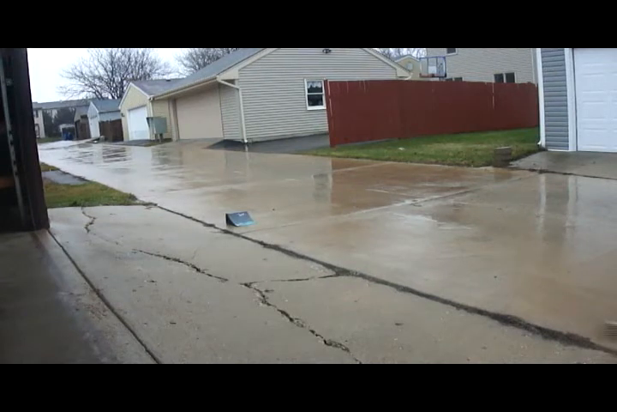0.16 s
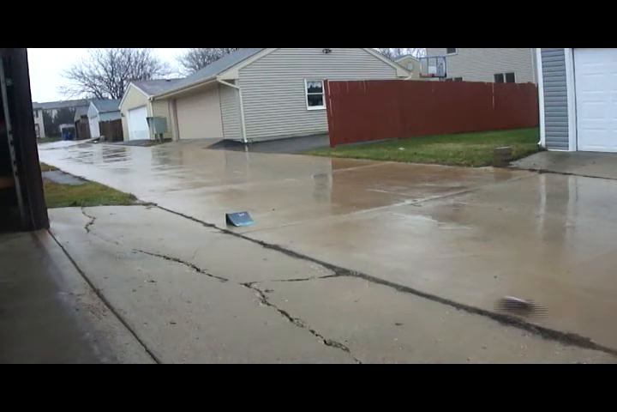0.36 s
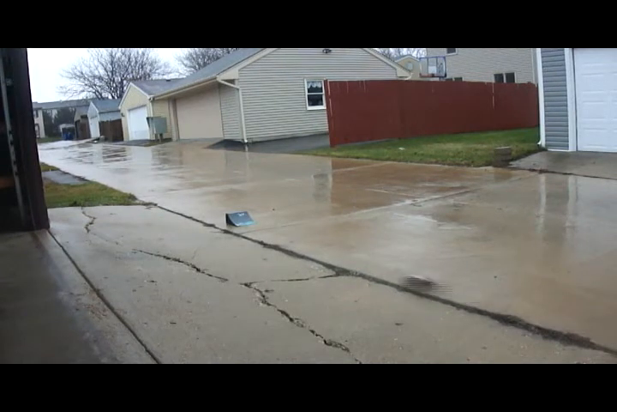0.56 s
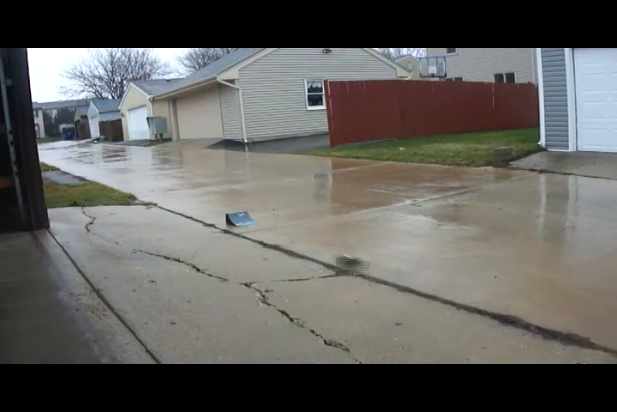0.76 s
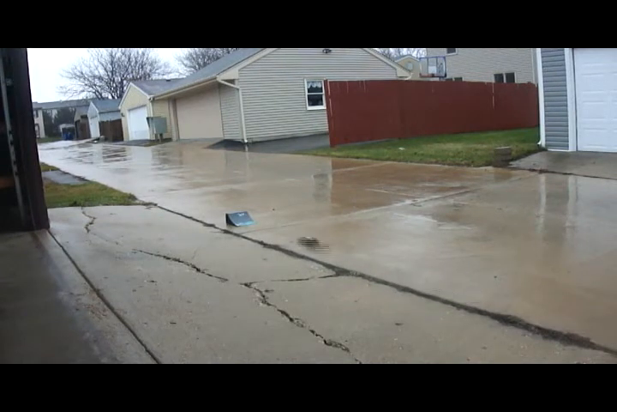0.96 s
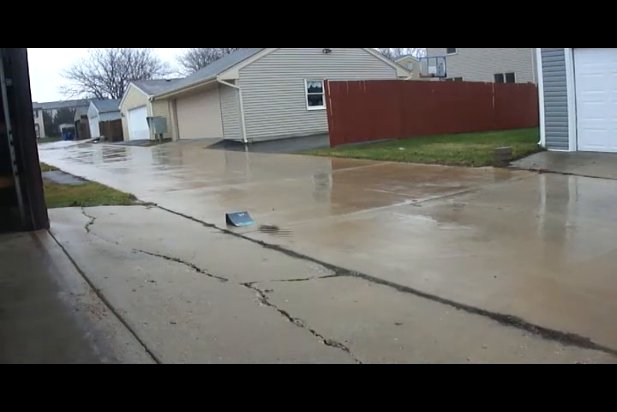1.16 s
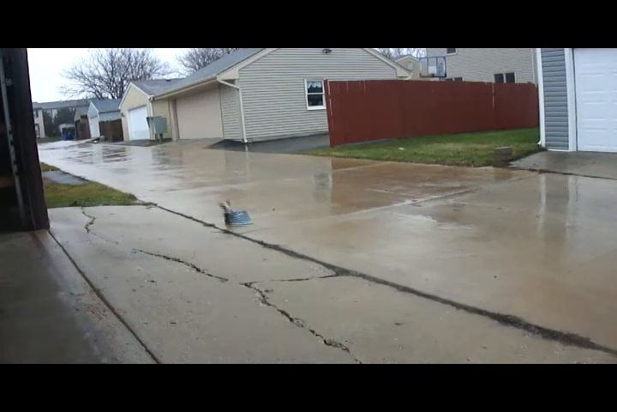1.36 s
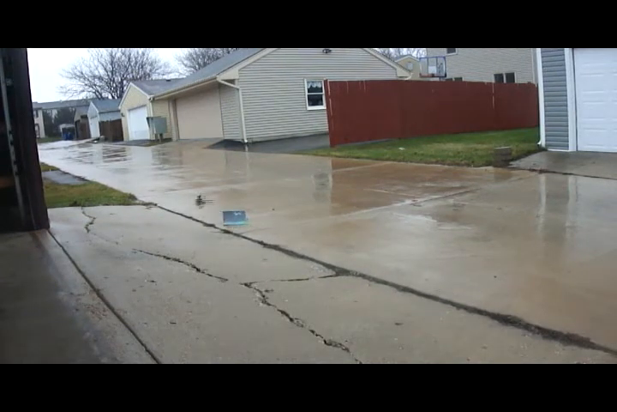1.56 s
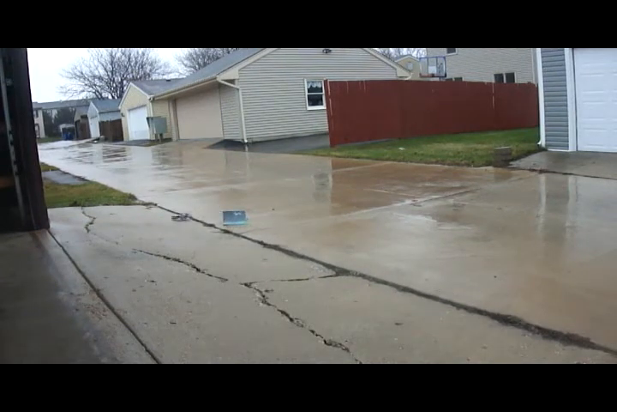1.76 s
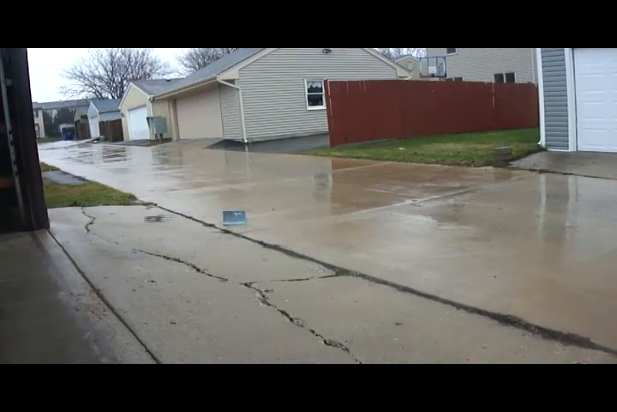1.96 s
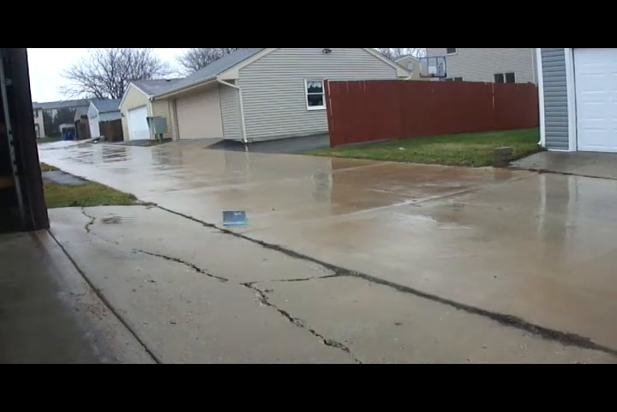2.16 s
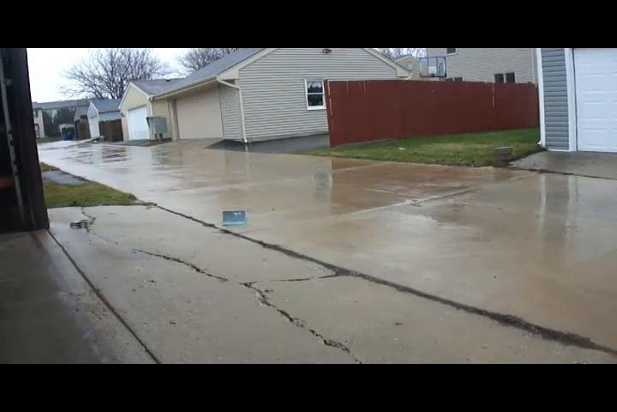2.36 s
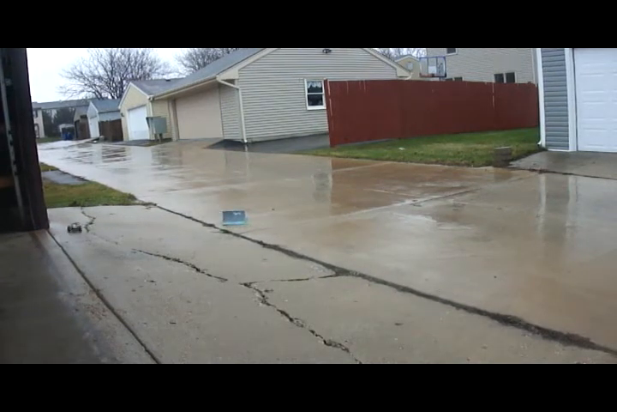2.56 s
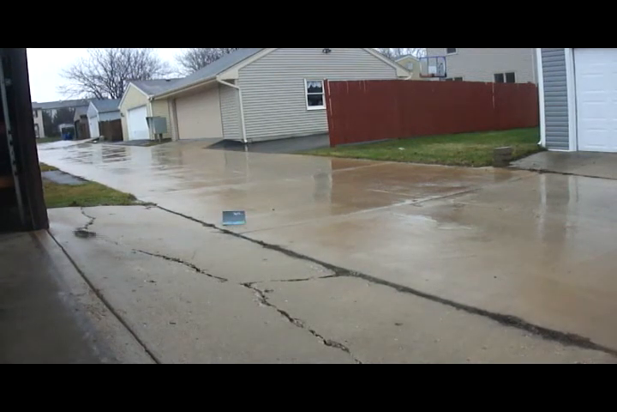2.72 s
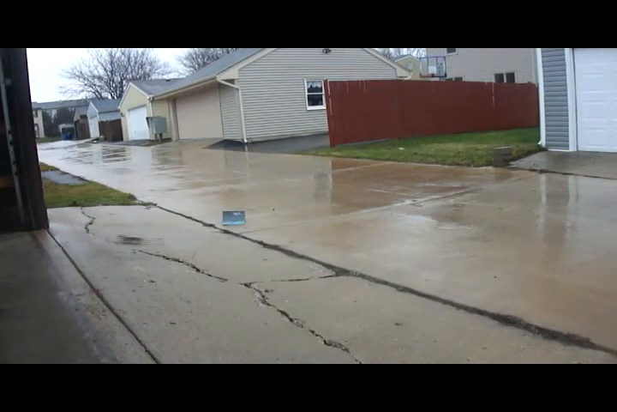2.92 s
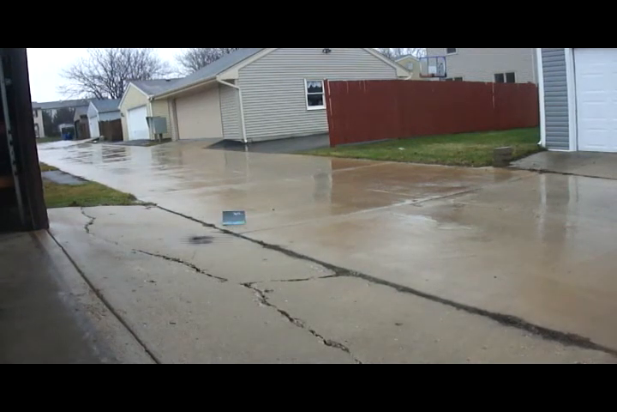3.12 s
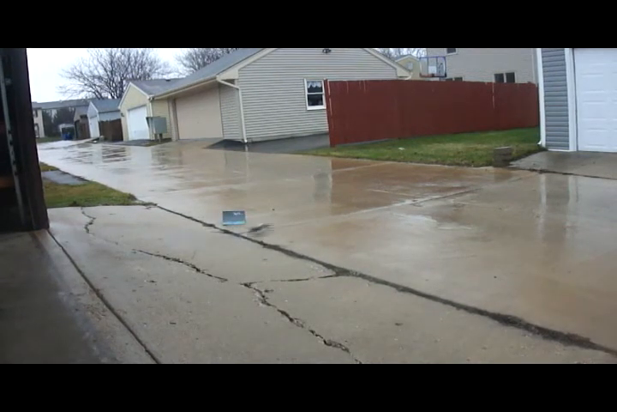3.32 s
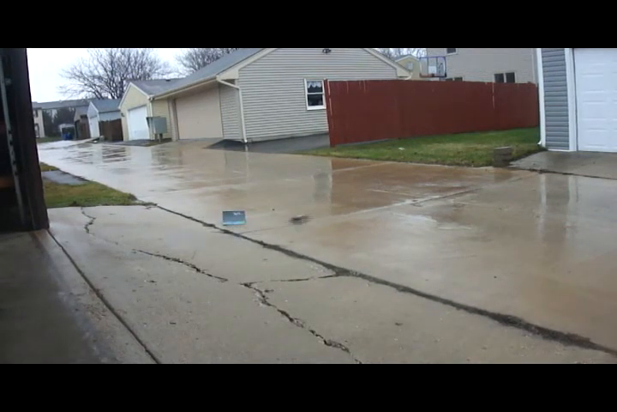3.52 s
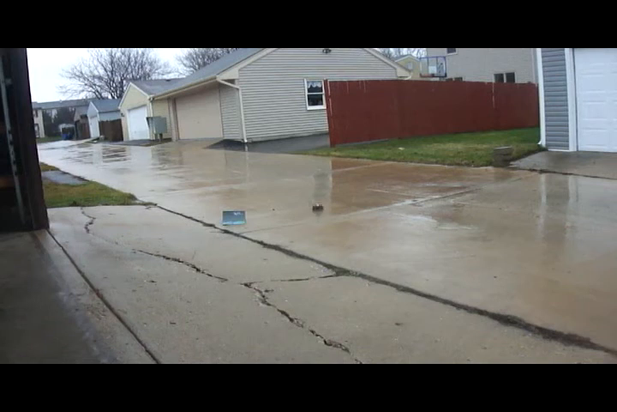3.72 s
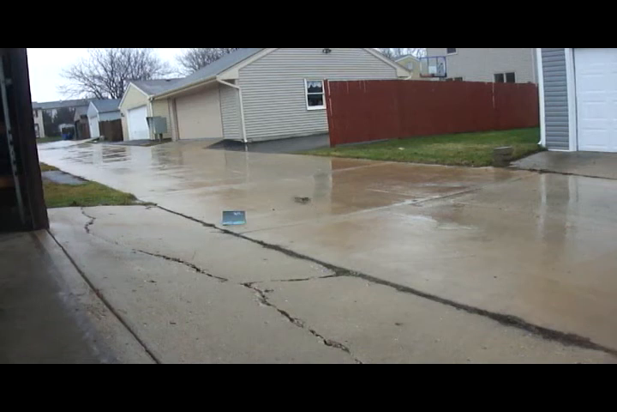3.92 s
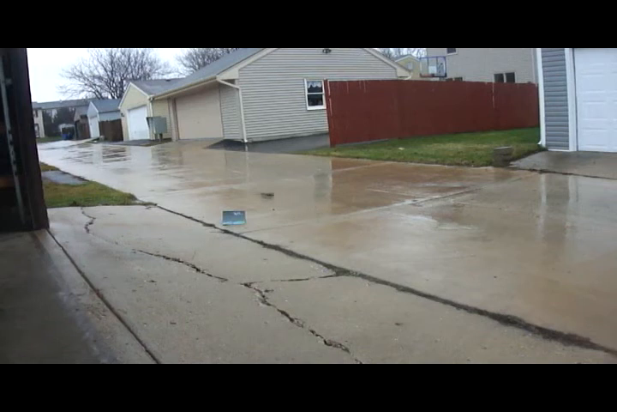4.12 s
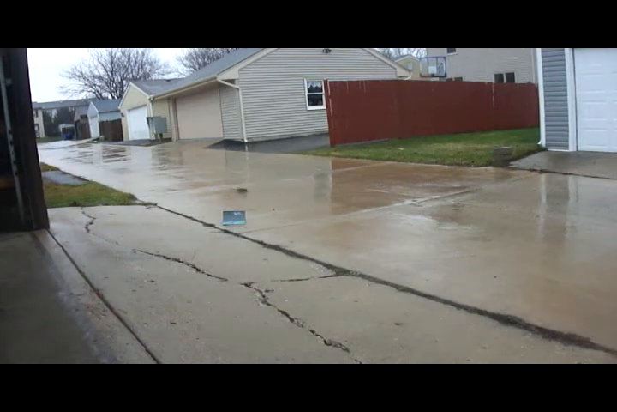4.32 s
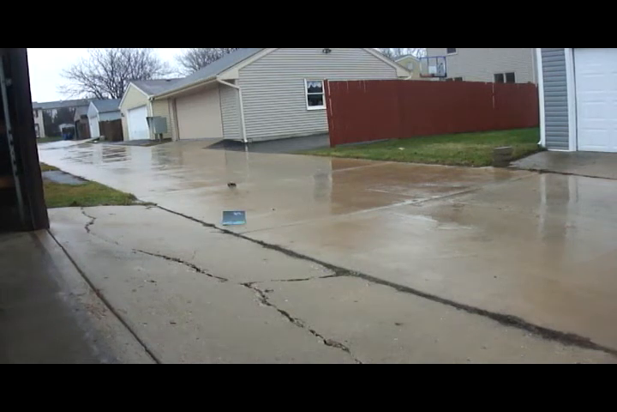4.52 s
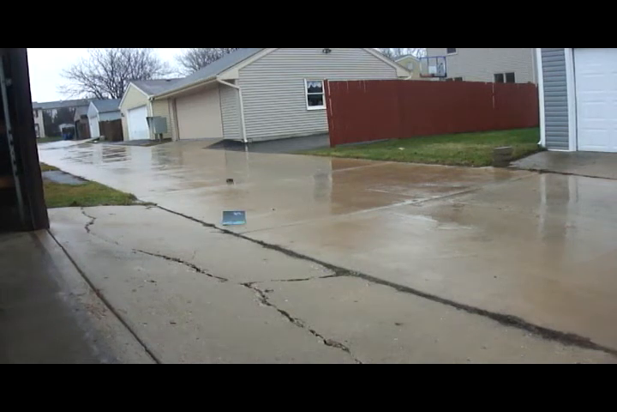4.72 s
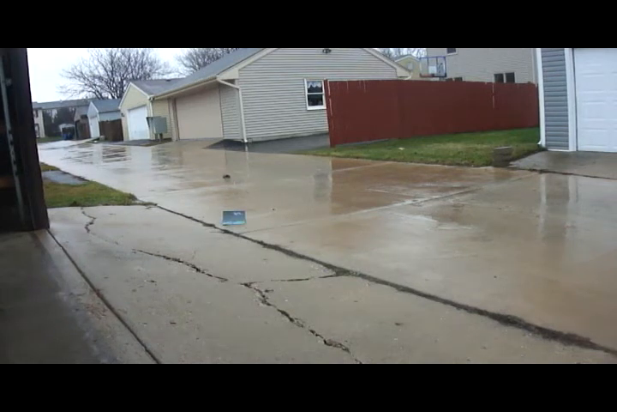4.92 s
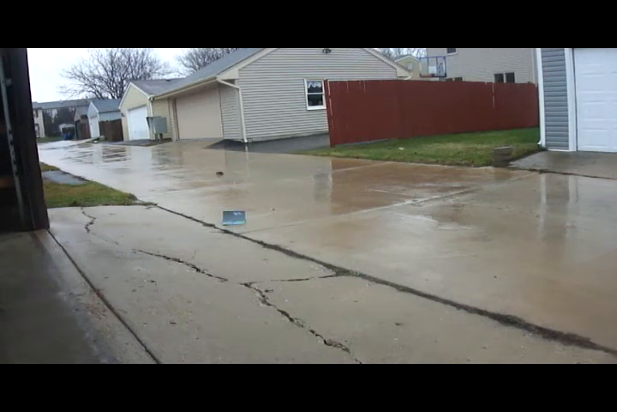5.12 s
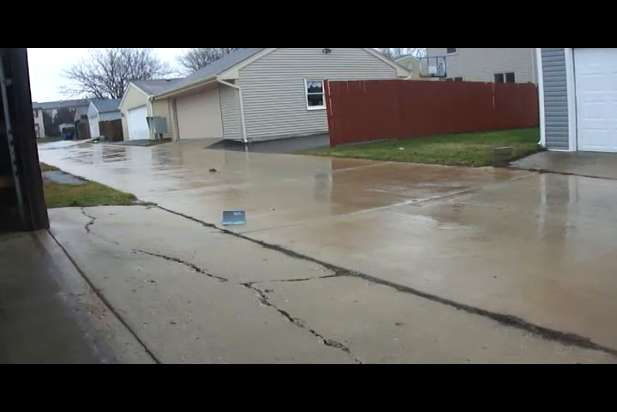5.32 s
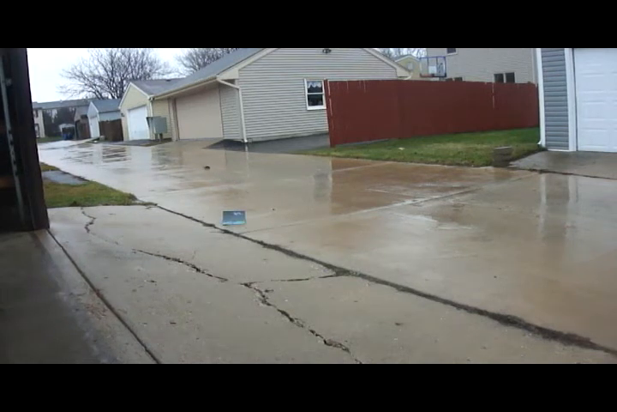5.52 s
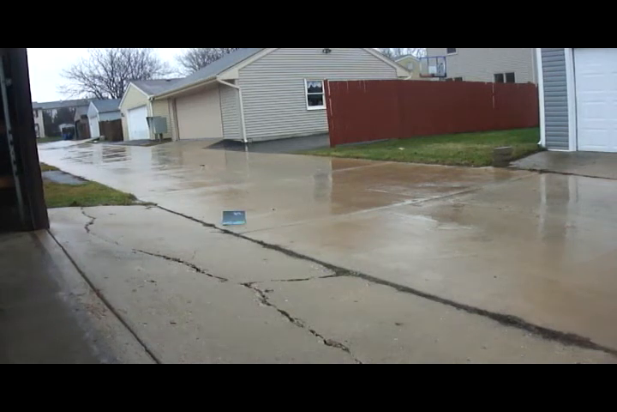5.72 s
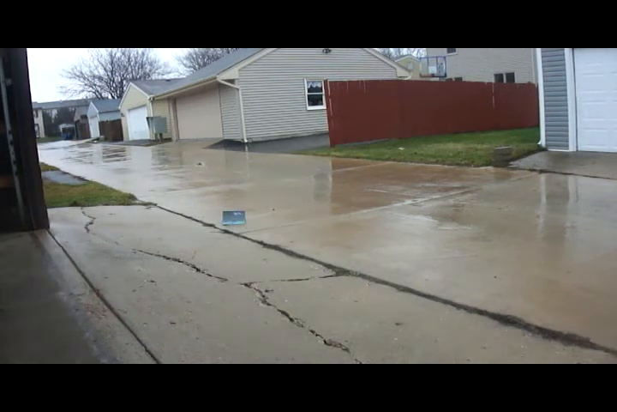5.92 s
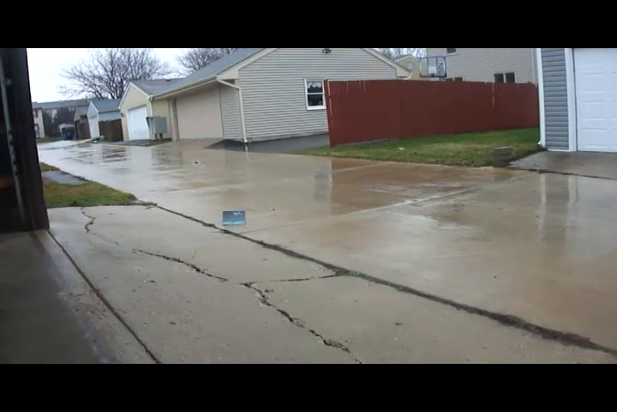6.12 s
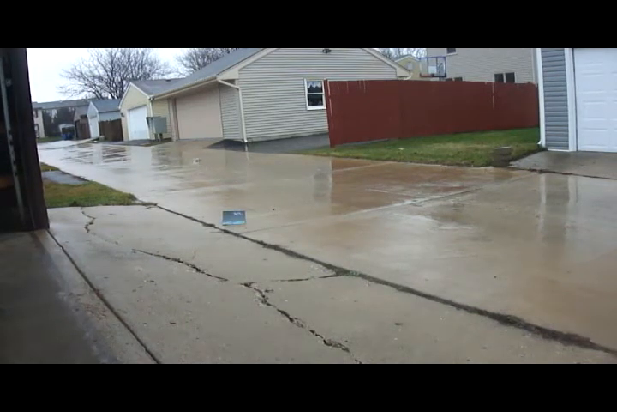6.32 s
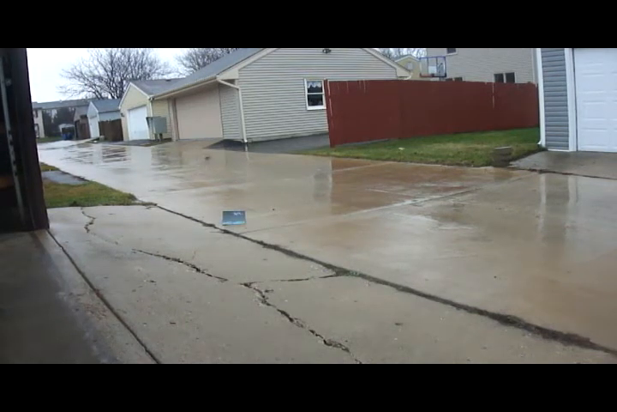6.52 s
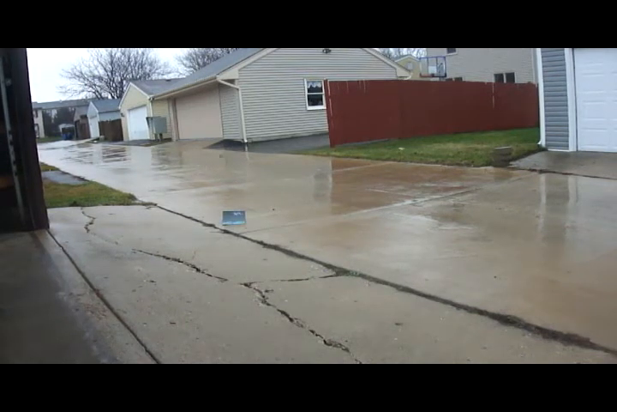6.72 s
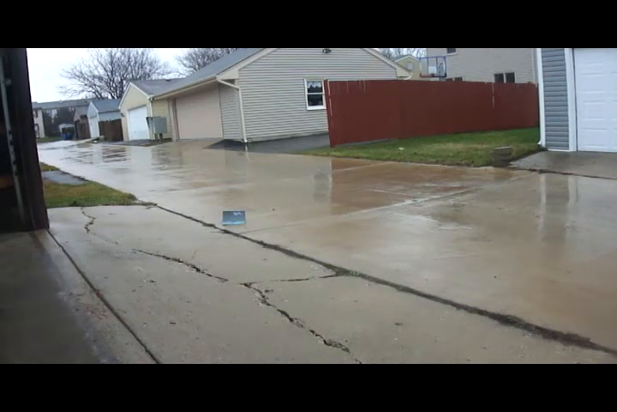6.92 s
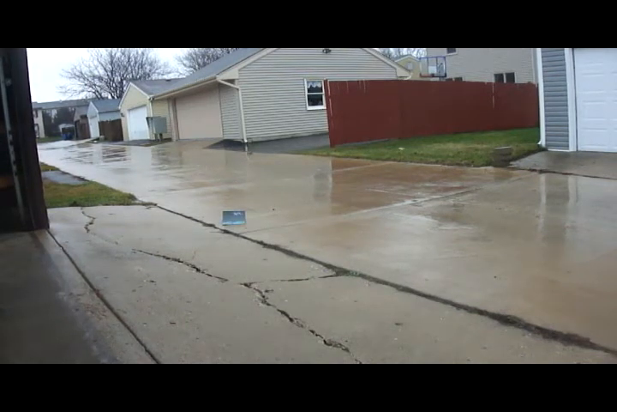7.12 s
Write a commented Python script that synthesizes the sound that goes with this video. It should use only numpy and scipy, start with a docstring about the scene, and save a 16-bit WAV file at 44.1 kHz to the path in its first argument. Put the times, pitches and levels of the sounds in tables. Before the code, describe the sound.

From just inside an open garage, a quiet steady outdoor wash lies under a small electric toy truck. At 0 s it is already close, its shrill, grainy gear whine climbing quickly from about 2.5 to 4 kHz, with plastic clatter and bright wet tyre hiss. At 1.3-1.7 s it strikes a loose metal sheet: a cluster of clanky, buzzing slaps and a sharp plastic crack, quickly damped. A landing knock follows at 1.77 s; the pitch drops and stutters in rasping chirps. Around 2.2-2.5 s it slows to a low, grinding crawl while turning, then bites and accelerates, peaking near 3.3 s. It runs away at high pitch, whine fluttering, hiss prominent, growing thin and hollow. From 5.6 s the pitch dips, with strained surges far off; at 6.7 s it drops to a faint throbbing chirp, then jerks up again at the end, around 7.25 s.

```python
"""A whining, rattling electric toy truck rolls into a wet alley, heard from an open garage.
It bangs over a sheet-metal ramp, lands, turns close by and speeds off into the distance.
Whine: a pinion tone, stuttering under load, plus chirps where the teeth bite.
Gears: random clatter and shaft-rate lines. Tyres: filtered spray hiss. Ramp: ringing modes, slaps, buzz.
Chassis knocks are decaying noise; a short garage tail and steady outdoor noise surround them."""
import sys
import numpy as np
from scipy import signal
from scipy.fft import rfft, irfft, next_fast_len
from scipy.io import wavfile
from scipy.ndimage import uniform_filter1d, map_coordinates

SR = 44100
rng = np.random.default_rng(int(sys.argv[2]) if len(sys.argv) > 2 else 0)


def write(x):
    x = np.atleast_2d(x).T
    wavfile.write(sys.argv[1], SR, np.round(np.clip(x, -1, 1) * 32767).astype(np.int16))

N = 321048

# Outdoor wash: (frequency [Hz], level [dB])
ALLEY_SPECTRUM = [(25, -59), (60, -14.5), (110, -7), (240, -2), (700, 0.6), (1000, 3.5), (1600, -1),
                  (2900, -2), (4500, -18), (6100, -11.5), (11000, -49)]
# Garage tail: (frequency [Hz], t60 [s])
GARAGE_T60 = [(200, 0.43), (2000, 1), (10000, 0.27)]

# Ramp sheet modes: (frequency [Hz], level [dB], t60 [s])
SHEET_MODES = [(269, -9.5, 0.45), (334, -3, 0.4), (367, -2, 0.78), (392, -3.5, 0.32), (418, -1, 0.22),
               (451.5, 6, 0.23), (627, -11, 0.19), (709, -4, 0.28), (905, -4.5, .2), (971, -0.5, 0.46),
               (1036, -8, .25), (1125, -5, .25), (1145, -4, .22), (1410, -0.5, 0.13), (1441, -3, .25)]
# Wheels strike the ramp, it slaps the ground: (time [s], relative level [dB], extra above 800 Hz [dB])
RAMP_BLOWS = [(1.317, -22, -0.5), (1.347, -23.5, 1), (1.371, -37, 15.5), (1.391, -24.5, 2.5),
              (1.423, -21, -1), (1.443, -26.5, 8.5), (1.467, -26, 7), (1.487, -18, -4.5),
              (1.532, -18.5, -4.5), (1.569, -21, -4), (1.622, -26.5, -3), (1.671, -32.5, -5)]
# Loose sheet rattling on the concrete: (frequency [Hz], level [dB])
SHEET_RATTLE_SPECTRUM = [(400, -34), (600, 3), (810, -6), (1000, -1.5), (1420, 0.5), (1600, -12),
                         (10000, -48)]

# Chassis hits the ramp, then the concrete: (time [s], relative level [dB], t60 [s])
CHASSIS_KNOCKS = [(1.322, -21.5, 0.066), (1.3747, -10.5, 0.014), (1.385, -18, 0.13), (1.421, -24.5, 0.2),
                  (1.759, -22, 0.08), (1.773, -17, 0.055)]
# Plastic chassis: (frequency [Hz], level [dB])
CHASSIS_SPECTRUM = [(30, -54), (150, -28), (500, 3), (1100, 11.5), (2000, 8), (3200, 10), (6000, 7.5),
                    (8500, -0.5), (11000, -11)]

# Driver's moves, each until the next: (start [s], tooth-mesh goal [Hz], lag of the speed [s], load [0-1],
# gear rattle [dB], tyre spray [dB]); levels at 1 m and CRUISE_HZ, before the mix.
# Rolls in, speeds up, cruises, climbs the ramp, flies, lands, grips, pulls on, brakes, crawls round,
# sets off, full throttle, gathers speed, hops with wheels free, eases off, crosses and leaves a puddle,
# runs on, races off, slows, turns far away, dabs the throttle, coasts, sets off again, jerks forward.
DRIVER_MOVES = [(0, 2630, 0.39, 0.73, -9.5, -24), (.145, 3830, 0.2, 0.66, -12, -24.5),
                (.63, 4010, 0.84, 0.52, -13.5, -22.5), (1.2, 4080, 0.37, 0.63, -12, -20),
                (1.47, 4130, 0.1003, 0.66, -15.5, -22), (1.77, 3286, 0.016, 0.89, -11.5, -26),
                (1.843, 2560, .012, 0.95, -11, -19), (1.98, 3290, 0.26, 0.87, -12.5, -19),
                (2.2, 1856, 0.094, 0.88, -10.5, -20), (2.32, 1696, 0.097, 0.86, -15, -24),
                (2.48, 2091, 2.6, 0.94, -8.5, -21), (2.63, 3234, 2.05, 0.81, -10, -16.5),
                (2.88, 4030, 0.73, 0.71, -10, -15.5), (3.26, 4513, 0.011, 0.62, -10.5, -16.5),
                (3.32, 3880, 0.042, 0.65, -10, -16.5), (3.62, 3930, 0.17, 0.76, -12, -13.5),
                (3.92, 3870, .1, 0.72, -11.5, -16.5), (4.03, 4176, 0.34, 0.62, -11.5, -15),
                (4.38, 4479, 0.9, 0.53, -15, -12), (5.6, 3323, .16, 0.98, -13.5, -11),
                (5.95, 3435, 1.7, 0.96, -18.5, -10), (6.45, 3866, 1.75, 0.73, -16, -13.5),
                (6.72, 2450, 0.02, 0.99, -15.5, -15), (7.11, 2553, 0.07, 0.84, -8.5, -12),
                (7.25, 2780, 0.0046, 0.91, -18, -11)]
# Truck to listener: (time [s], distance [m])
DISTANCE_M = [(0, 2.8), (.5, 2.94), (1.3, 4.24), (2.6, 3.9), (3.3, 5.68), (4, 6.17), (6, 14.14),
              (7.28, 28.6)]
# Hollows far down the alley, at full depth: (frequency [Hz], level [dB])
FAR_HOLLOWS = [(1850, -2), (2090, 3.5), (2350, -2), (2700, -6.5), (3080, -4), (3280, 1.5), (3680, -0.5),
               (3850, -5), (4100, 0), (4600, 0), (5050, 2)]
# Growth and easing of those hollows: (time [s], depth [0-1])
HOLLOW_DEPTH = [(3.3, 0.1), (4.6, 1), (6.2, 0.5), (7.1, 0.4)]

# Tyre spray: (frequency [Hz], level [dB])
SPRAY_SPECTRUM = [(800, -25), (2400, -1.5), (3000, -5.5), (3900, 5), (4400, 5.5), (5600, 2), (6200, 1.5),
                  (6850, -2.5), (7500, -1.5), (8700, -7), (11000, -15.5)]
# Brightness of the spray: (time [s], level of the top [dB])
SPRAY_TOP = [(0, 1), (.5, 9.5), (1.2, 1.5), (2.3, -6), (2.8, -5.5), (3.4, 1), (4.2, -2), (6.3, -5.5),
             (7.28, 0)]

# Gearbox clatter: (frequency [Hz], level [dB])
GEARBOX_SPECTRUM = [(300, -40), (900, -14.5), (1300, -5.5), (1480, -6.5), (1630, 0.5), (1950, 1), (2350, 3),
                    (2650, 2), (3000, -5), (3400, 0.5), (4100, -13), (6000, -10.5), (11000, -31)]
# Side lines of the ten-tooth pinion: (multiple of the shaft rate, level [dB])
SHAFT_LINES = [(4, -8.5), (5, -6.5), (6, -7), (7, -7), (8, -13.5), (9, -14), (12, -13.5)]
# How well the housing radiates a line: (frequency [Hz], level [dB])
HOUSING_RESPONSE = [(700, -57), (1220, -12.5), (1400, 1), (1580, -2), (1750, 2.5), (1950, -2.5),
                    (2100, 0.5), (2400, -2.5), (2600, -8.5), (2700, 3), (2900, -5.5), (3350, -1),
                    (3700, -10), (4100, 4.5), (4400, 1.5), (7000, -2)]
# High ring of the close pass: (time [s], level [dB])
SHIMMER_LEVEL = [(0, -48), (.1, -38.5), (.7, -41), (1, -44), (1.6, -100)]

# Teeth bite as the wheels catch; the evenly spaced rows from 7.10 to 7.20 s are one more train of throbs, once
# a turn of the spur gear: (start [s], peak before BITE_DB [dB], pitch at the peak [Hz])
TOOTH_BITES = [(1.830, -13.5, 3216), (1.8792, -14, 2420), (1.9043, -12, 2550), (1.928, -15, 2560),
               (2.008, -13, 2700), (2.0604, -12.5, 2693), (2.0866, -14.5, 3220), (2.166, -11, 3190),
               (2.1883, -12.5, 3350), (2.3337, -18, 1814), (2.3708, -18, 1750), (2.5275, -11.5, 1770),
               (2.534, -14, 1690), (2.555, -10, 1700), (2.568, -17, 1980), (2.621, -11.5, 1950),
               (2.65, -17, 2147), (2.678, -16, 2432), (2.697, -11, 2554), (2.722, -7, 2564),
               (2.764, -8, 2720), (2.81, -12, 3253), (2.9397, -14, 3400), (5.842, -18, 3680),
               (7.0997, -24, 2480), (7.1206, -23, 2460), (7.1483, -22, 2500), (7.173, -18.5, 2510),
               (7.199, -20.5, 2520), (7.2529, -24, 2980)]
# Far off, the gearbox throbs in even trains of short chirps: (start [s], end [s], rate [1/s],
# first level before BITE_DB [dB], last level before BITE_DB [dB], first pitch [Hz])
THROB_TRAINS = [(6.526, 6.781, 53, -34, -31.5, 2680), (6.803, 6.955, 39.9, -28, -29, 2540)]
# Pinion sings under torque: (start [s], length [s], level at 1 m before the mix [dB], fade in and out [s])
WHINE_SURGES = [(0, 0.4, -13, 0.0046), (0.42, 0.36, -15, 0.019), (0.832, 0.32, -20, .02),
                (1.867, 0.16, -9, .004), (2.061, 0.13, -8, .005), (2.511, 0.27, -9, 0.0042),
                (2.85, 0.38, -13, .015), (3.275, 0.029, -13, 0.0051), (3.678, .14, -17, 0.039),
                (3.911, 0.185, -6.5, 0.067), (4.451, 1.01, -17.5, .1), (5.78, 0.066, -8, .005),
                (5.927, 0.061, -11, 0.0049), (6.008, 0.28, -7, 0.0077), (6.273, 0.18, -8.5, 0.029),
                (6.574, 0.085, -6, 0.012), (7.258, 0.031, 3.5, 0.0046)]
# Wall echo of the whine: (time [s], Doppler shift [share of pitch], level beside the direct whine [dB])
WALL_ECHO = [(.2, -0.06, -7), (.45, -0.04, -1), (.75, -0.016, -9), (2.5, .04, -3.5), (3.1, -.03, -6),
             (4.05, .02, -7), (6, .06, -12)]
# Gear cover rung by tooth blows: (frequency [Hz], level [dB])
COVER_SPECTRUM = [(2850, -42), (3200, 7), (3350, -1), (3500, -3), (3800, -44)]

START_HZ, CRUISE_HZ = 2568, 4010  # tooth mesh on arrival; where the rattle and spray levels hold
RATTLE_DB_PER_OCTAVE, SPRAY_DB_PER_OCTAVE = 6, 3.5  # faster is louder
THROTTLE_S = 0.0334  # one move blends into the next
SPUR_TEETH = 56
RUNOUT_DB, RUNOUT_HZ = 3, 28  # the off-centre spur gear presses harder once a turn and pulls the pitch
WAVER_HZ = 29.67  # bumps in the concrete shake the speed, at full load
FLUTTER_DB = 4  # reflection off the ground makes the lightly loaded whine come and go
IDLE_WHINE_DB = -23  # at 1 m between surges, before the mix
LOW_EDGE_HZ = 1360  # the small housing radiates little below this
COVER_DB = -14  # the cover's ring under heavy load
BITE_DB, BITE_S = -8, 0.0059  # gain of all bites; time from start to peak
BITE_SAG = 0.033  # pitch drop while a bite rises, as a share of the peak pitch
FLEX_S = 0.00016  # the sheet bends as it rings, so its modes waver
MODE_SPREAD_DB = 2.2
CHOKE_S = 0.086  # t60 added to the old ring once the next blow presses on the sheet
TOP_HZ = 11000


def amp(db):
    """Decibels to gain."""
    return 10 ** (np.asarray(db) / 20)


def unit(x):
    """Scale to rms 1."""
    return x / np.sqrt(np.mean(x ** 2) + 1e-20)


def along(points, hz):
    """Interpolate (Hz, value) points on a log frequency axis."""
    f, v = np.transpose(points)
    return np.interp(np.log(hz + 1), np.log(f + 1), v)


def curves(rows):
    """One value per sample for each column after the time."""
    s, *cols = np.transpose(rows)
    return [np.interp(np.arange(N) / SR, s, c) for c in cols]


def wobble(rate_hz):
    """Smooth random curve, rate_hz knots a second."""
    knots = rng.standard_normal(int(N * rate_hz / SR) + 4)
    return map_coordinates(knots, [np.arange(N) * rate_hz / SR])


def filtered(x, response):
    """x times a response of frequency."""
    m = next_fast_len(N + SR // 2)
    return irfft(rfft(x, m) * response(np.fft.rfftfreq(m, 1 / SR)), m)[:N]


def coloured(x, spectrum):
    """x through a (Hz, dB) spectrum, at rms 1."""
    return unit(filtered(x, lambda hz: amp(along(spectrum, hz))))


def ticks(rate_hz, spread_db):
    """Random tiny impacts of uneven size, at rms 1."""
    hits = rng.random(N) < rate_hz / SR
    size = rng.standard_normal(N) * amp(spread_db * rng.standard_normal(N))
    return unit(hits * size)


def deep(x):
    """The part of x below the housing's low edge."""
    return filtered(x, lambda hz: 1 / (1 + (hz / LOW_EDGE_HZ) ** 16))


def alley():
    """Steady outdoor wash of a wet day: coloured noise."""
    return amp(-39) * coloured(rng.standard_normal(N), ALLEY_SPECTRUM)


def garage(x):
    """Walls round the listener answer with a short tail, damped by frequency."""
    hz, t, z = signal.stft(rng.standard_normal(SR // 2), SR, nperseg=256)
    decay = amp(-60 * t / along(GARAGE_T60, hz)[:, None])
    tail = signal.istft(z * decay, SR, nperseg=256)[1]
    delayed = np.pad(tail, (SR // 200, 0))  # 5 ms
    return signal.fftconvolve(x, delayed / np.linalg.norm(tail))[:N]


def hollowed(x):
    """Far down the alley, bounces off ground and walls cancel narrow bands."""
    hz, t, z = signal.stft(x, SR, nperseg=1024)
    hollows_db = np.interp(hz, *np.transpose(FAR_HOLLOWS), left=0, right=0)[:, None]
    depth = np.interp(t, *np.transpose(HOLLOW_DEPTH))
    return signal.istft(z * amp(depth * hollows_db), SR, nperseg=1024)[1][:N]


def ramp():
    """Each blow chokes the loose sheet, rings it anew and slaps it on the concrete, where it buzzes."""
    t = np.arange(SR) / SR
    hz, mode_db, t60_s = np.transpose(SHEET_MODES)[:, :, None]
    ringing, slaps = np.zeros((2, N))
    gaps_s = np.diff(np.transpose(RAMP_BLOWS)[0], append=N / SR)
    for (s, db, hard_db), gap_s in zip(RAMP_BLOWS, gaps_s):
        size, angle = rng.standard_normal((2, len(SHEET_MODES), 1))
        flexed = t + FLEX_S * wobble(41.0)[:SR]
        level_db = mode_db + MODE_SPREAD_DB * size + hard_db * (hz > 800)
        modes = amp(level_db - 60 * t / t60_s) * np.sin(2 * np.pi * (hz * flexed + angle))
        ring = modes.sum(0)
        rise = amp(db) * (1 - np.exp(-t / 0.004))
        choke_db = -60 * np.maximum(t - gap_s, 0) / CHOKE_S
        ringing[round(s * SR):][:SR] += amp(-3.5 + choke_db) * rise * ring
        slaps[round(s * SR):][:SR] += amp(-2.0) * rise * amp(-60 * t / 0.042)
    swing = np.sqrt(np.abs(uniform_filter1d(ringing ** 2, size=600)))
    buzz_spectrum = [(90, -62), (190, -21), (270, -4), (460, 3.5), (560, -7), (1150, -17),
                     (1600, -21), (10000, -50)]
    buzz = coloured(rng.standard_normal(N), buzz_spectrum)
    rattle = coloured(ticks(900, spread_db=3), SHEET_RATTLE_SPECTRUM)
    return ringing + (amp(-7.5) * swing + slaps) * buzz + amp(-8.0) * swing * rattle


def knocks():
    """Short dry cracks of the plastic chassis: noise under sudden, decaying force."""
    t = np.arange(N) / SR
    force = np.zeros(N)
    for s, db, t60_s in CHASSIS_KNOCKS:
        force += (t >= s) * amp(db - 60 * np.abs(t - s) / t60_s)
    return force * coloured(rng.standard_normal(N), CHASSIS_SPECTRUM)


def moves():
    """Mesh rate, load, rattle and spray per sample: the speed eases to the goal of each move."""
    t = np.arange(N) / SR
    start, goal_hz, lag_s, *settings = np.transpose(DRIVER_MOVES)
    i = np.maximum(np.searchsorted(start, t, side="right") - 1, 0)
    from_hz = np.append(START_HZ, goal_hz)[i]
    length_s = np.diff(start, append=N / SR)[i]
    done = np.expm1(-(t - start[i]) / lag_s[i]) / np.expm1(-length_s / lag_s[i])
    mesh_hz = from_hz + (goal_hz[i] - from_hz) * done
    blend = max(round(THROTTLE_S * SR), 1)
    load, rattle_db, spray_db = [uniform_filter1d(v[i], size=blend) for v in settings]
    return mesh_hz, np.clip(load, 0, 1), rattle_db, spray_db


def distance_db():
    """Sound pressure falls as one over the truck's distance."""
    metres, = curves(DISTANCE_M)
    return -20 * np.log10(metres)


def spur():
    """Pressure on the spur gear, swinging from -1 to 1 once a turn."""
    return np.sin(2 * np.pi * np.cumsum(moves()[0]) / SR / SPUR_TEETH)


def tyres():
    """Treads fling fine droplets; the brightness of the hiss changes over time."""
    mesh_hz, _, _, wet_db = moves()
    spray_db = wet_db + SPRAY_DB_PER_OCTAVE * np.log2(mesh_hz / CRUISE_HZ) + distance_db()
    top_db, = curves(SPRAY_TOP)
    droplets = rng.standard_normal(N) + 0.42 * ticks(2500, spread_db=4.0)
    hiss = coloured(droplets, SPRAY_SPECTRUM)
    top = filtered(hiss, lambda hz: 1 / (1 + (7200 / (hz + 1)) ** 8))
    # patches of deeper water make each part flutter
    body = amp(2.1 * wobble(70) + 0.65 * spur()) * (hiss - top)
    top = amp(top_db + 1.7 * wobble(60)) * top
    return amp(spray_db + 2.0 + 0.64 * wobble(30)) * (body + top)


def gears():
    """Teeth clatter in the plastic gearbox; uneven teeth add lines at multiples of the shaft rate."""
    mesh_hz, load, effort_db, _ = moves()
    rattle_db = effort_db + RATTLE_DB_PER_OCTAVE * np.log2(mesh_hz / CRUISE_HZ) + distance_db()
    shaft_hz = mesh_hz / 10
    shaft_phase = 2 * np.pi * np.cumsum(shaft_hz) / SR
    impacts = ticks(5000, spread_db=0.0) * amp(1.14 * wobble(110) + 1.8 * spur())
    clatter = coloured(impacts, GEARBOX_SPECTRUM)
    # under heavy load the teeth stay in contact and the clatter loses its low end
    contact = np.clip((load - .7) / 0.16, 0, 1)
    clatter = clatter - contact * deep(clatter)
    lines = np.zeros(N)
    for order, db in SHAFT_LINES:
        order = round(order)
        slack = .8 * wobble(50) + .85 * load * wobble(220)
        line_db = db + along(HOUSING_RESPONSE, order * shaft_hz) + 3.46 * wobble(40)
        lines += amp(line_db) * unit(np.sin(order * shaft_phase + slack))
    return amp(rattle_db) * (amp(-1.5) * clatter + (1 - 0.63 * load) * lines)


def shimmer():
    """Thin high ring that pulses with the spur gear, heard only while the truck passes close."""
    db, = curves(SHIMMER_LEVEL)
    band = [(7000, -50), (7900, -7), (8400, 4), (9200, -8), (10200, -50)]
    ring = coloured(rng.standard_normal(N), band)
    return amp(db) * unit(amp(4.1 * spur()) * ring)


def throbs():
    """Even trains of short chirps, each train sinking in pitch, as (s, dB, Hz)."""
    rows = []
    for start, end, rate_hz, first_db, last_db, hz in THROB_TRAINS:
        for s in np.arange(start, end, 1 / rate_hz):
            db = np.interp(s, [start, end], [first_db, last_db]) + 1.73 * rng.standard_normal()
            rows.append((s, db, hz * (1 - (s - start) * 0.3)))
    return rows


def bites():
    """Each catch of the wheels, and each throb, is a short rasping chirp of the teeth."""
    t = np.arange(N) / SR
    out = np.zeros(N + SR)
    u = t[:SR // 10] / BITE_S  # 1 at the peak
    rasp_spectrum = [(900, -25), (1700, 4), (3300, 7.5), (4500, -8), (7300, -1.5), (11000, -31)]
    rasp = coloured(rng.standard_normal(N), rasp_spectrum)
    slip = wobble(420)
    sagging_s = BITE_S * (u + BITE_SAG * (u - u ** 2 / 2))
    envelope = (u * np.exp(1 - u)) ** 2
    for s, db, hz in list(TOOTH_BITES) + throbs():
        span = slice(round(s * SR), round(s * SR) + len(u))
        n = len(t[span])
        phase = 2 * np.pi * hz * sagging_s[:n] + 0.78 * slip[span]
        chirp = np.sqrt(2) * np.sin(phase) + amp(-8.5) * rasp[span]
        out[span][:n] += amp(db + BITE_DB) * envelope[:n] * chirp
    return out[:N]


def surges():
    """Whine level in dB at 1 m: each surge rises, holds and dies back to the idle whine."""
    t = np.arange(N) / SR
    power = amp(IDLE_WHINE_DB) ** 2
    for s, length_s, db, fade_s in WHINE_SURGES:
        rise = np.clip((t - s) / fade_s, 0, 1)
        fall = np.exp(-np.clip((t - s - length_s) / fade_s, 0, 20))
        power = power + (amp(db) * rise * fall) ** 2
    return 10 * np.log10(power)


def whine():
    """Pinion mesh tone: level flutters when running free; under load it wavers, stutters and smears."""
    mesh_hz, load, _, _ = moves()
    level_db = surges() + distance_db()
    # backlash jolts the speed and makes the teeth touch in bursts
    jolt_hz = 10 * wobble(70) + load ** 4 * (65 * wobble(130) + 185 * wobble(700))
    press = spur()
    speed_hz = mesh_hz + WAVER_HZ * load ** 2 * wobble(35) + RUNOUT_HZ * press + jolt_hz
    phase = 2 * np.pi * np.cumsum(speed_hz) / SR
    bursts_db = 6.7 * load * np.tanh(wobble(140)) + 0.85 * load * np.tanh(wobble(900))
    stutter = unit(amp(RUNOUT_DB * (1 - load ** 4) * press + bursts_db))
    # the wall's echo is a second strand at its own pitch; the two paths fade in turn
    shift, echo_db = curves(WALL_ECHO)
    echo_hz = speed_hz * (1 + shift) + WAVER_HZ * wobble(60)
    echo = np.sin(2 * np.pi * np.cumsum(echo_hz) / SR)
    balance = amp(echo_db + 4 * wobble(40))
    strands = (np.sin(phase) + balance * echo) / np.sqrt(1 + balance ** 2)
    overtones = np.zeros(N)
    for k in range(2, 4):
        overtones += amp(along(HOUSING_RESPONSE, k * mesh_hz) - 7.1 * k) * np.sin(k * phase)
    scuff = amp(-17.0) * load * coloured(rng.standard_normal(N), SPRAY_SPECTRUM)
    # at a crawl the heavy tooth blows ring one mode of the case
    crawl = np.clip((2250 - mesh_hz) / 300, 0, 1)
    case_band = [(3200, -33), (3750, 5), (4000, 6), (4250, -3), (4900, -46)]
    case = amp(-4.5) * crawl * coloured(rng.standard_normal(N), case_band)
    # under heavy load, above a crawl, they ring the gear cover
    heavy = np.clip((load - .6) / 0.27, 0, 1) * (1 - crawl)
    cover = amp(COVER_DB) * heavy * coloured(rng.standard_normal(N), COVER_SPECTRUM)
    mesh = unit(unit(strands + load * overtones) + scuff + case + cover)
    flutter_db = FLUTTER_DB * (1 - load) * wobble(45)
    tone = amp(level_db + flutter_db) * stutter * mesh
    return tone - deep(tone)


def scene():
    """The truck and the ramp, their garage tail and the background."""
    rolling = hollowed(amp(-1.74) * gears() + amp(-2.5) * tyres())
    drive = amp(-4.5) * whine() + bites() + rolling + amp(-0.5) * shimmer()
    truck = drive + ramp() + knocks()
    return (truck + amp(-8.0) * garage(truck) + alley())[None]


def record(dry):
    """Cut everything from TOP_HZ up."""
    return filtered(dry[0], lambda hz: hz < TOP_HZ)[None]


dry = scene()
out = record(dry)
write(out)
```